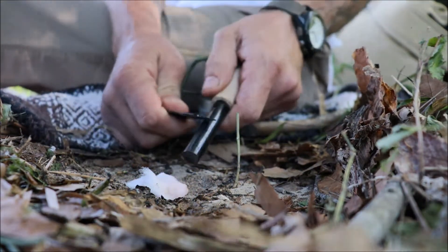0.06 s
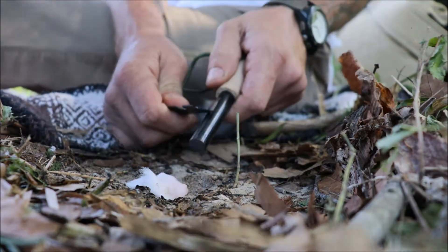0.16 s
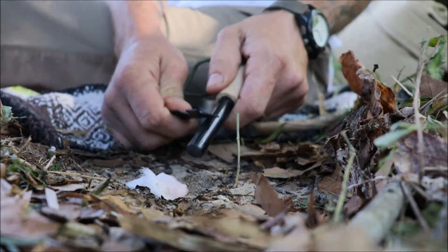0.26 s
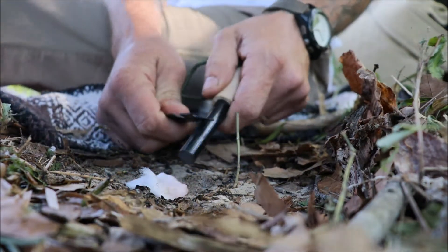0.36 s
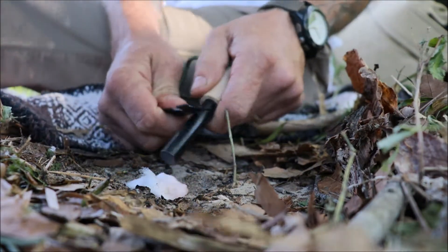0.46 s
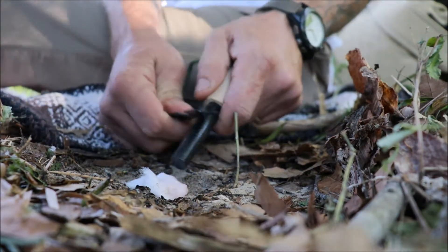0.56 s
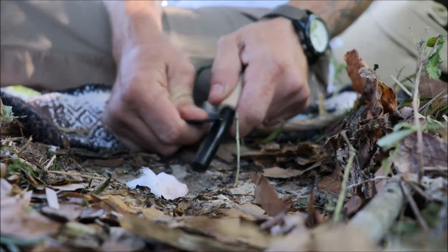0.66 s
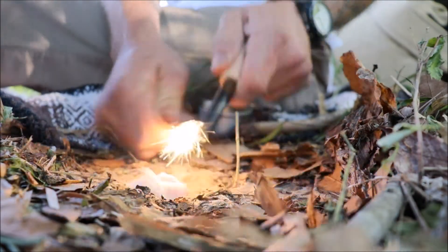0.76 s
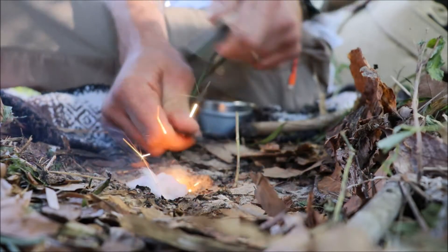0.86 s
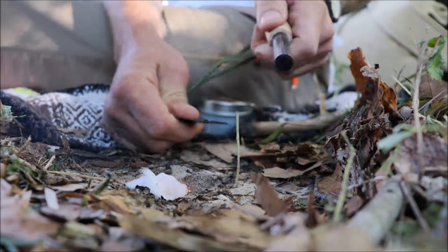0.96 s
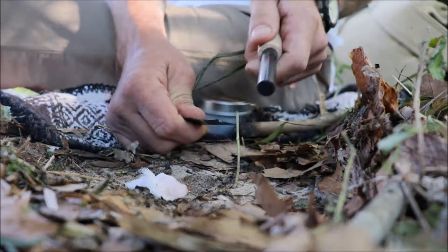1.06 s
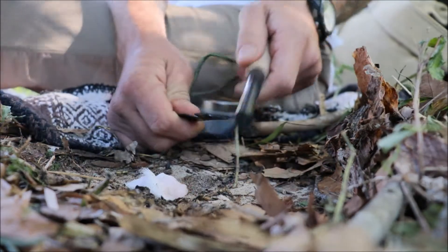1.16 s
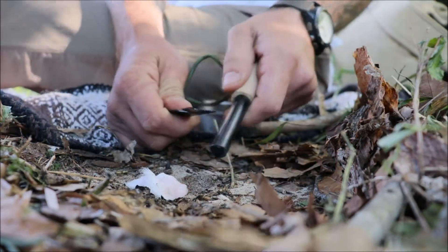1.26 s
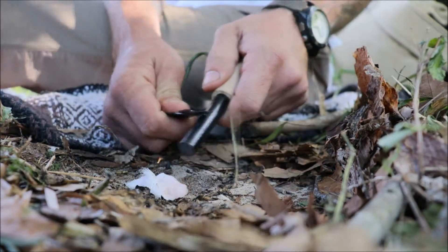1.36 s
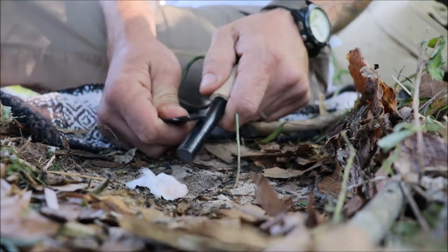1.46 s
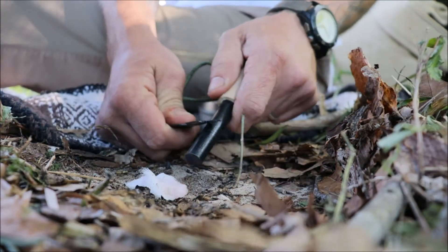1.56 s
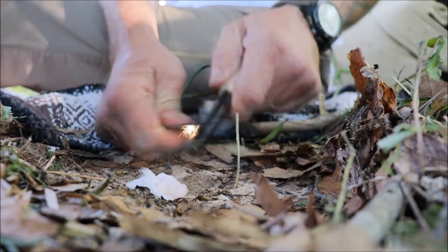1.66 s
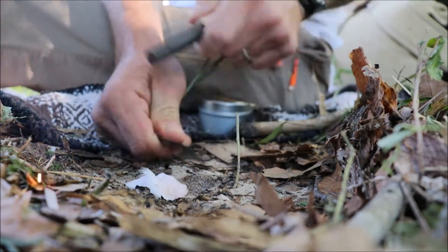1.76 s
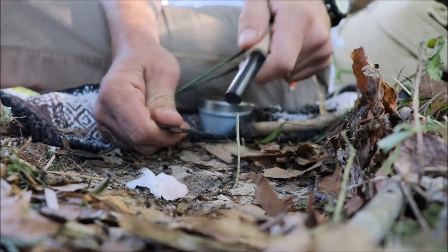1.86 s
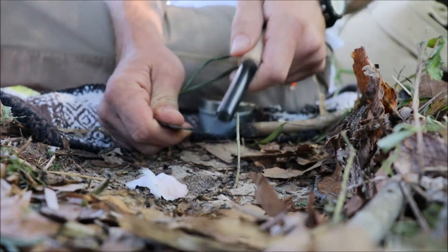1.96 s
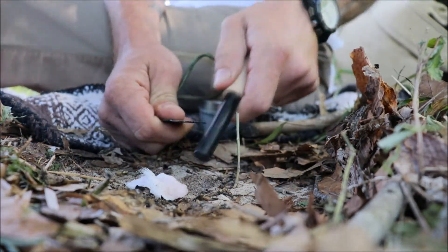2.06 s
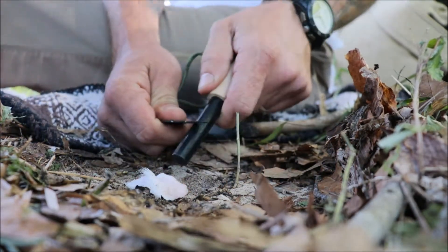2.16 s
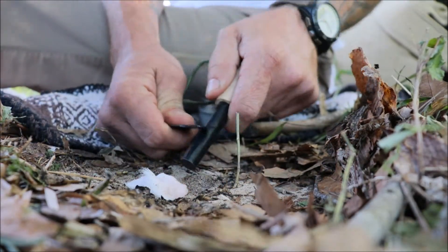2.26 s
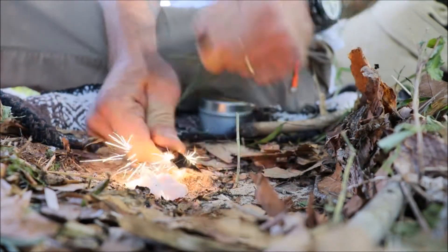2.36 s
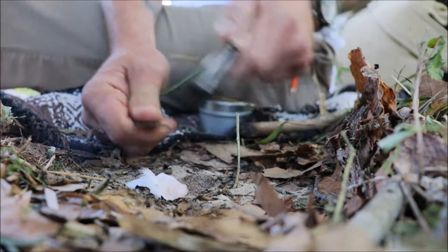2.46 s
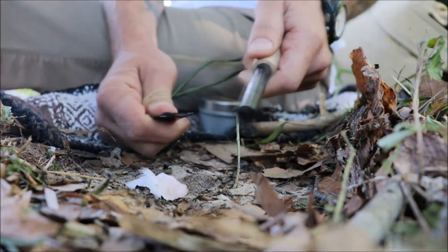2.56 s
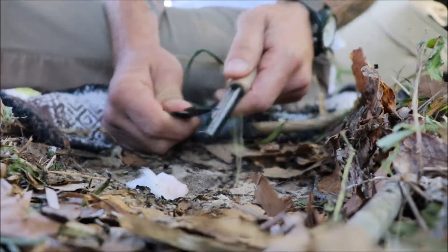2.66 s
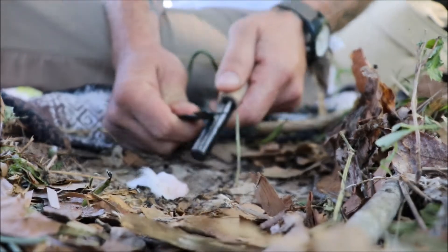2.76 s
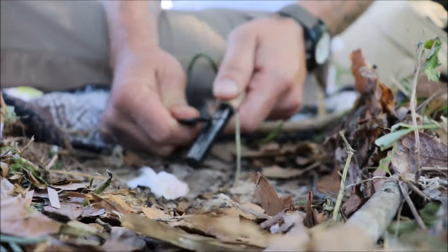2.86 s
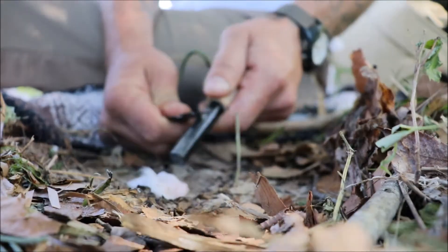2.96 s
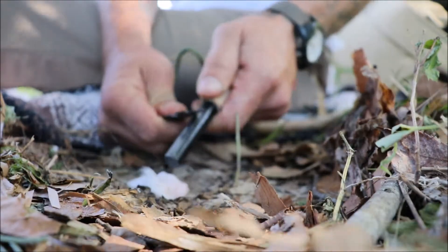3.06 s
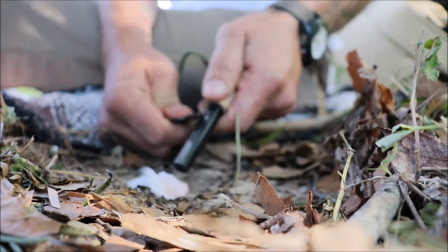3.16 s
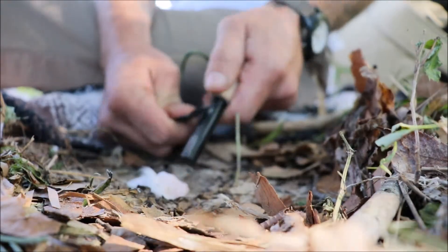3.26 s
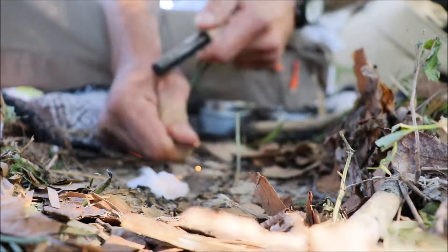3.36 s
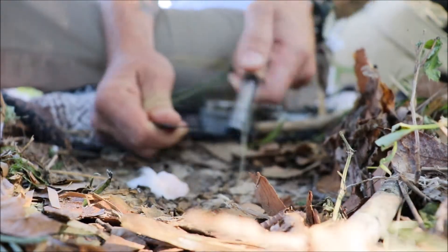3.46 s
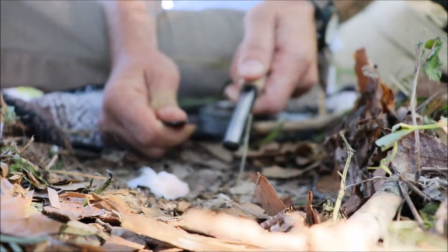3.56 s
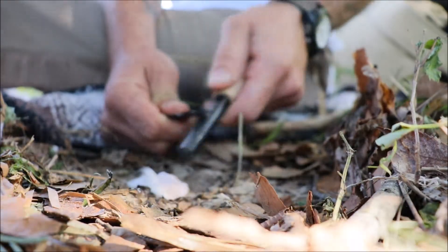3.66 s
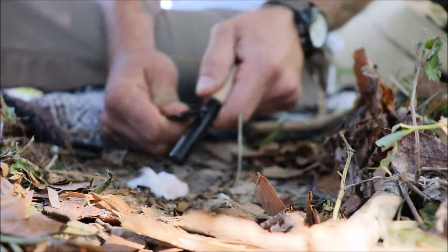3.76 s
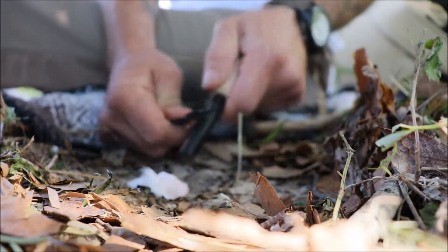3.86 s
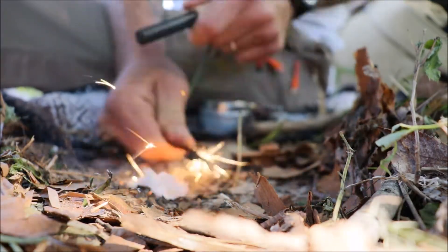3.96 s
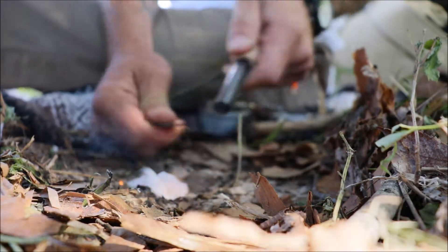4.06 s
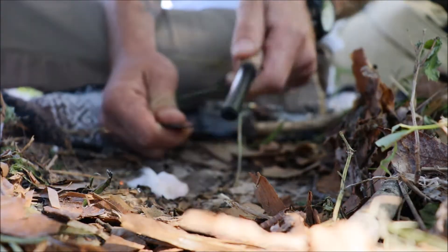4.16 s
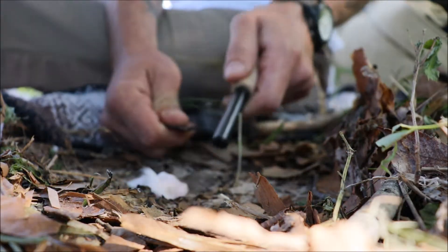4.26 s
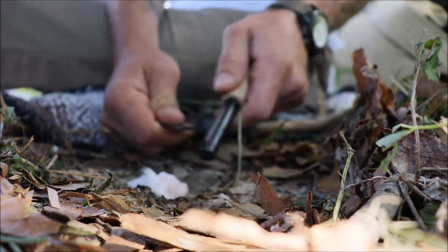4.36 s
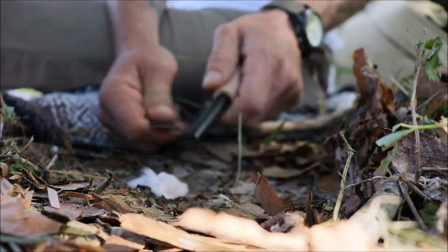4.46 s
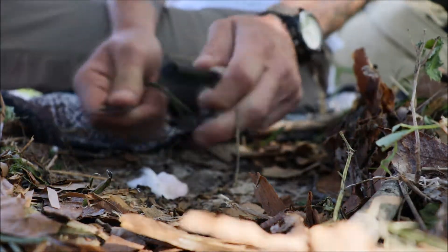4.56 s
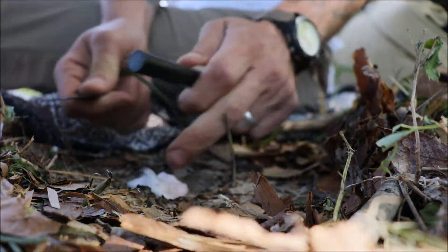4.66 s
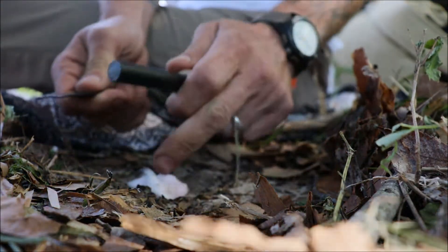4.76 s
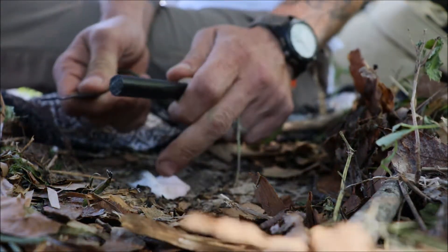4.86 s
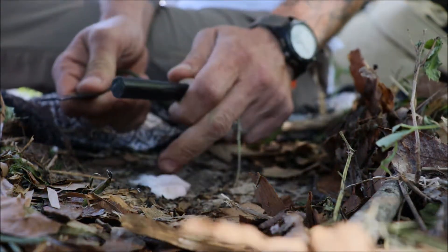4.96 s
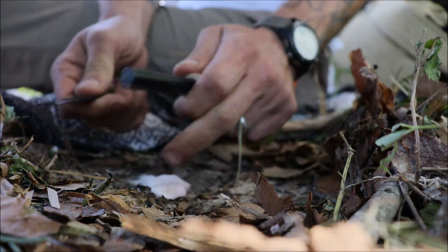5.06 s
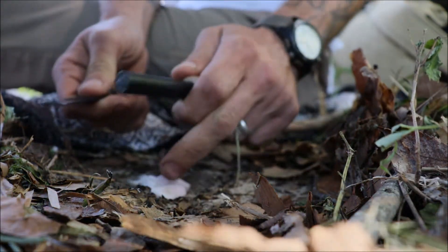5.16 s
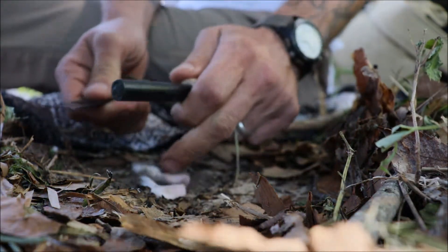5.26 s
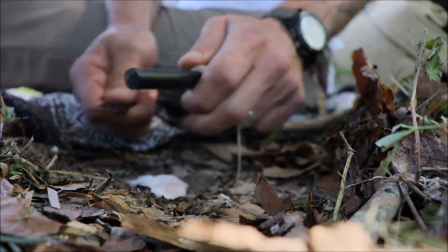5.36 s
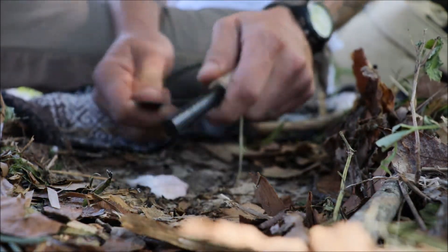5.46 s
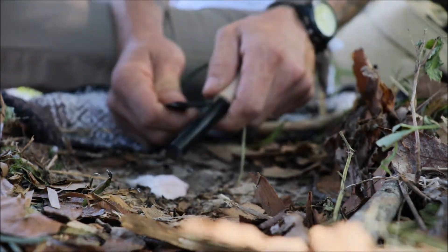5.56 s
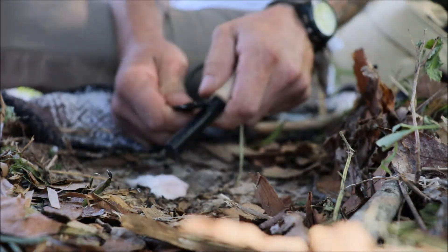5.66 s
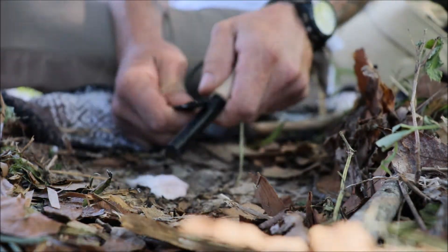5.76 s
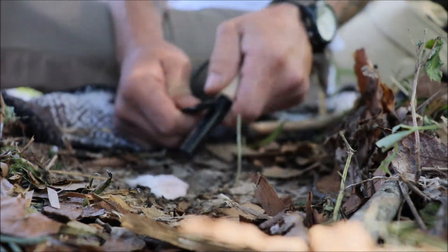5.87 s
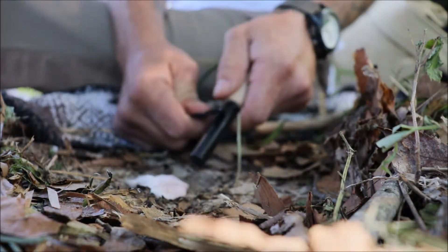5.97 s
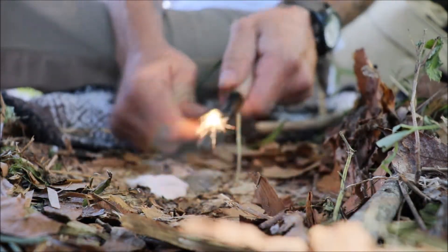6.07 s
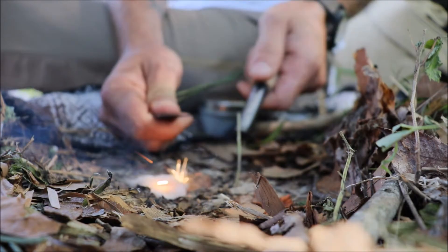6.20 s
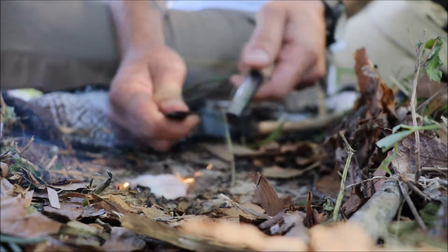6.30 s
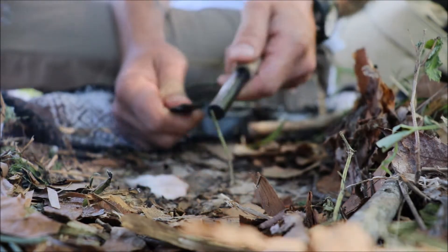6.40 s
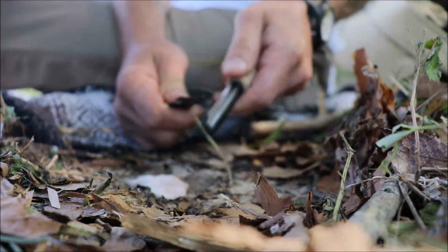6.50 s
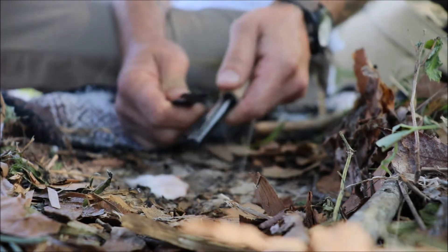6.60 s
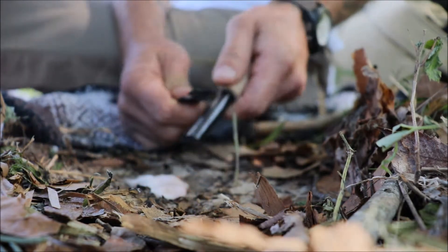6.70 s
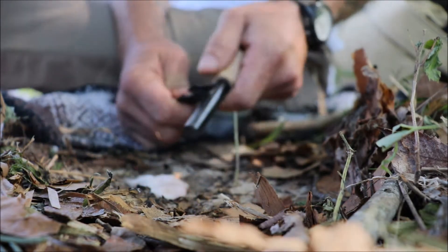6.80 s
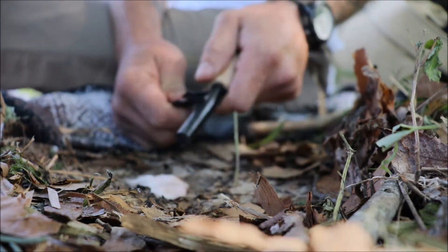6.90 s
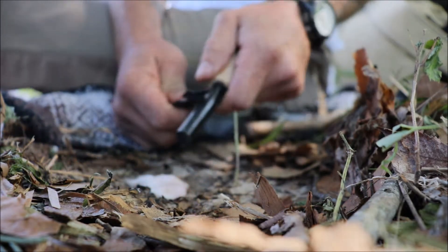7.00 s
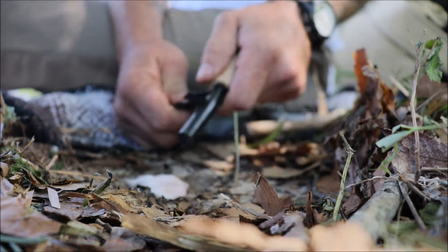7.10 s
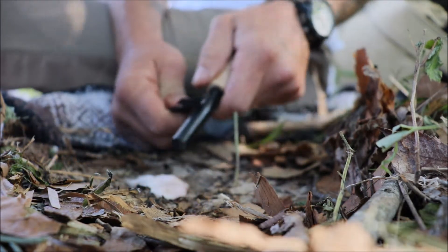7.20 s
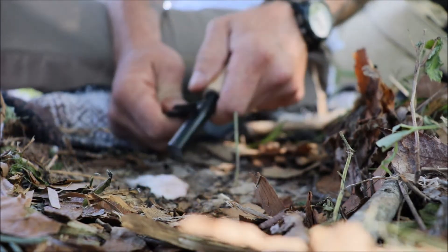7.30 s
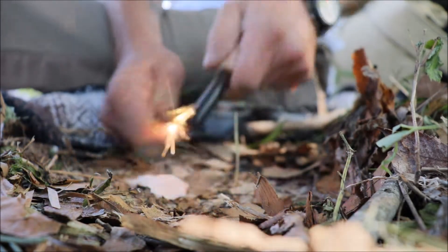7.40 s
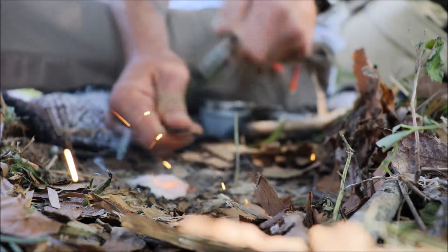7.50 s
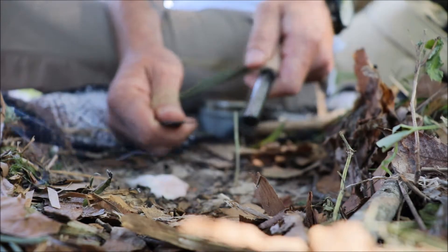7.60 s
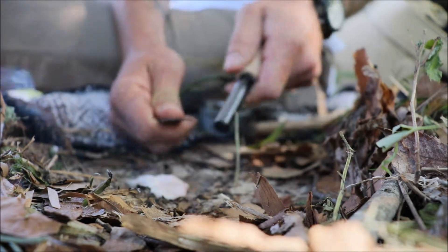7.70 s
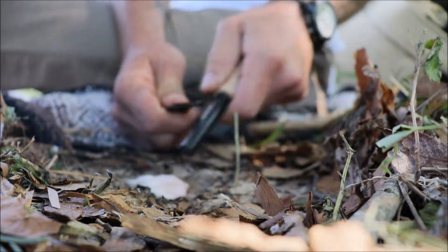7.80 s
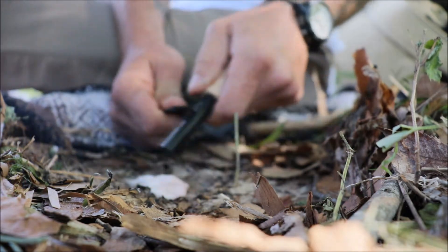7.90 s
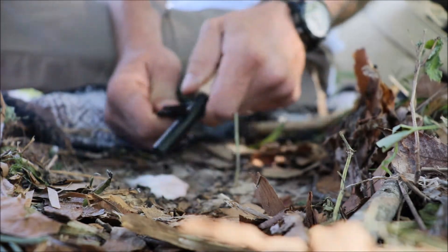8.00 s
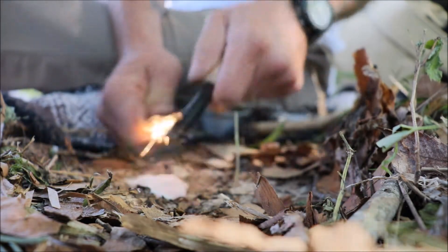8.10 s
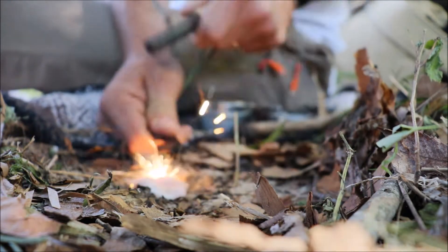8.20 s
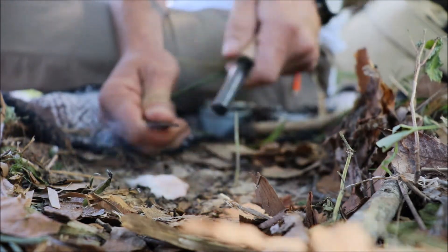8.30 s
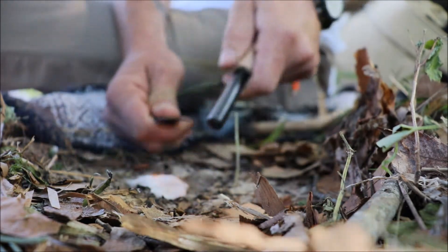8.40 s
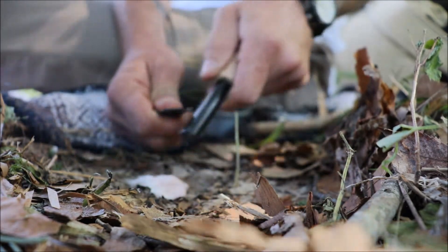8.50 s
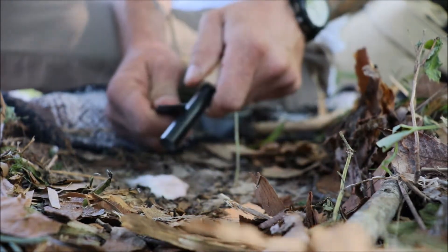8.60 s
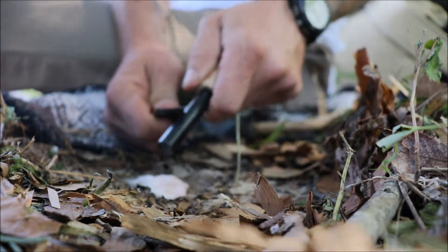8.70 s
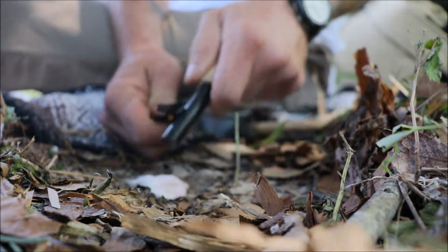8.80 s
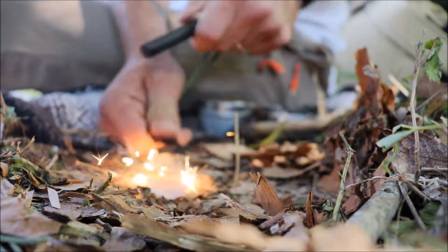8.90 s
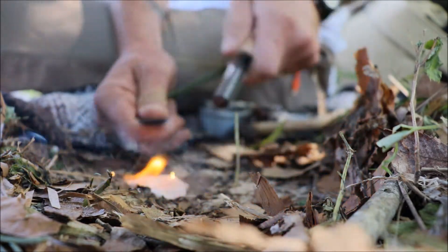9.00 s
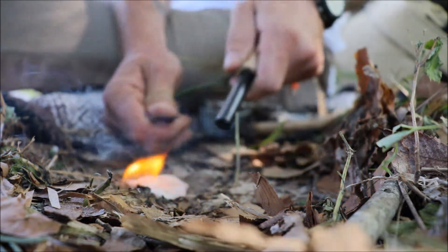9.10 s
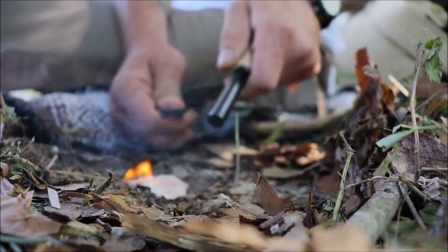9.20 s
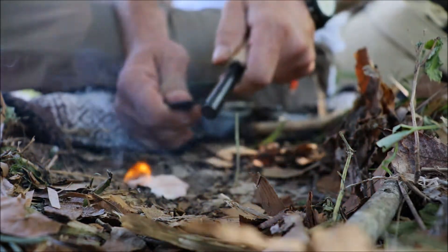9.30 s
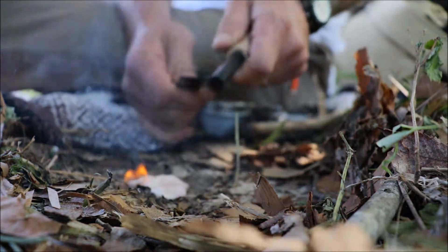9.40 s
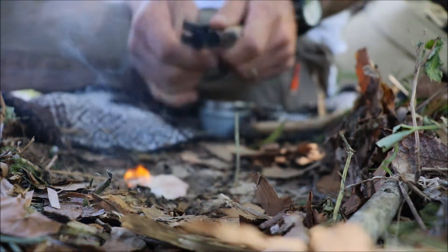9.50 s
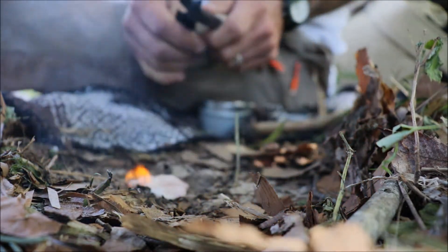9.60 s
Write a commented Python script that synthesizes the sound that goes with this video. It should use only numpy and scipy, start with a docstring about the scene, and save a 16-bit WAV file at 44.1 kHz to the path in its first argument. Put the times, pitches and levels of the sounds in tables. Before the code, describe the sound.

A metal scraper strikes a fire rod in repeated sharp scrapes, sparks crackling and popping, until tinder catches and sputters outdoors.

```python
"""A steel scraper works a fire rod on a forest floor, close to a single microphone.
Over a breeze and the hiss of the woods, the ground is bumped and leaves rustle. The scraper taps the
rod, then friction drives its bending modes into a short ring and burning shavings crackle and pop.
Stroke follows stroke; on four early ones the blade springs off the rod's end. From halfway a far bird
chirps faintly. Near 9 s the last stroke lights the tinder, which sputters."""
import sys
import numpy as np
from scipy import signal
from scipy.io import wavfile
from scipy.ndimage import uniform_filter1d

SR = 44100
rng = np.random.default_rng(int(sys.argv[2]) if len(sys.argv) > 2 else 0)


def output_pcm(signal):
    """Save a mono or channel-first signal as 16-bit PCM at the path in sys.argv[1].

    Samples are clipped to [-1, 1] before scaling.
    """
    pcm = np.clip(np.atleast_2d(signal).T, -1, 1) * 32767
    wavfile.write(sys.argv[1], SR, np.round(pcm).astype(np.int16))


N = 425565

# strength of the breeze and of the hiss of the woods: (time [s], level [dB])
BREEZE_LEVELS = [(0.0, -41), (0.35, -50), (1.07, -40.5), (1.64, -59.5), (3.06, -53.5), (3.3, -46),
                 (3.73, -62.5), (4.57, -47.5), (5.32, -63), (5.99, -63), (6.23, -47), (6.45, -62),
                 (7.23, -68), (8.25, -65), (8.79, -71), (9.0, -57), (9.65, -61)]
WOODS_LEVELS = [(0.0, -46.5), (8.5, -51.5)]
# spectra of breeze, woods, leaves, and a pop arriving off the ground: (frequency [Hz], density [rel dB])
BREEZE_SPECTRUM = [(8.8, -24), (15, 5), (134, 1.5), (230, -8), (273, -12), (539, -51), (1320, -120)]
WOODS_SPECTRUM = [(35, -15.5), (60, -9.5), (217, -2), (469, -9), (636, -9.5), (1550, -11), (2650, -11.5),
                  (8710, -15), (16000, -26.5)]
LEAF_SPECTRUM = [(120, -52), (200, -5.5), (482, -6), (579, -18), (722, -5), (1000, -4), (2470, -11.5),
                 (8580, -24.5), (16000, -42)]
SPARK_SPECTRUM = [(59, -32), (100, -7.5), (189, -2), (634, -2.5), (1130, 0.5), (1720, 1), (4110, -1),
                  (5770, 1), (6700, -2.5), (8460, 4.5), (10700, -6), (12900, 1.5), (16000, -2.5)]
# a knee or hand bumps the ground: (time [s], gain [dB])
GROUND_BUMPS = [(.035, -31), (1.148, -27)]
# leaves and cloth under the hands: (peak time [s], level [dB], rise [s], fall [s], hold [s])
LEAF_RUSTLES = [(0.36, -29, 0.057, 0.059, 0.038), (0.493, -44, 0.047, 0.031, 0.048),
                (1.0, -53.5, .1, .2, 0.38), (1.536, -43, 0.02, 0.025, 0.02),
                (1.58, -43.5, 0.01, 0.03, 0.015), (3.785, -44, 0.035, 0.065, .01),
                (3.932, -42, 0.22, 0.038, 0.013), (4.343, -49.5, 0.2, 0.44, 0.072),
                (7.024, -51.5, 0.12, 0.12, 0.022), (7.412, -44, 0.033, .03, 0.0092),
                (0.225, -47.5, 0.27, 0.11, 0.069)]
# bending modes of the gripped rod: (frequency [Hz], base t60 [s])
ROD_MODES = [(2815, 0.022), (7480, 0.021), (10600, 0.01), (13500, 0.012)]
# the scraper knocks on the rod; a loose grip lets it ring longer: (time [s], gain [dB], mode 1 [rel dB],
# mode 3 [rel dB], mode 4 [rel dB], tick [rel dB], ring length [ratio], pitch [ratio], trace [rel dB])
ROD_TAPS = [(0.1326, -22, -3.5, -30, -27, -12, 0.43, 0.96, -32),
            (1.4112, -8.5, -8.5, -25, -6, -9, 0.34, 0.92, -42),
            (2.1936, -15.5, -6.5, -20, -12, -9, 0.43, 0.86, -26),
            (2.7616, -11.5, -20, -11, -0.5, -10.5, 0.55, 0.94, -30),
            (3.7462, -20.5, -5, -21, -6, -0.5, 0.92, 0.98, -32),
            (5.7375, -41.5, 13, -9, -5, 10.5, 0.23, 1.14, -18),
            (6.4067, -16.5, 3.5, -30, -9, -12, 1.2, 1.02, -26),
            (6.4163, -34.5, 12, -27, -26, -14, 1.5, 1.005, -32),
            (6.791, -15.5, 5, -8, -7, -2, 0.97, 0.99, -32),
            (7.9467, -25.5, 5, -16, 7, 12.5, 0.39, 0.98, -15),
            (8.596, -38.5, 8, -18, -8, 5, 0.35, 0.93, -32)]
# the edge drags along the rod; where it bites sets what rings: (start [s], length [s], bite gain [dB],
# end gain [dB], mode 1 [rel dB], mode 3 [rel dB], mode 4 [rel dB], grinding [rel dB], pitch [ratio],
# ring length [ratio])
ROD_STROKES = [(0.136, 0.23, -50, -58, -17, -20, -20, -12, 1.001, .6),
               (0.455, 0.058, -45, -38, -9, -18, -19, -6, 1.001, 0.47),
               (0.808, 0.035, -29.5, -18, -13.5, -17, -1.5, -4.5, 1.02, 0.27),
               (1.728, 0.041, -30, -21, -22, -4, -2.5, -3.5, 1.04, 0.18),
               (2.387, 0.041, -28, -26, -16, -8, -7, -3.5, 1.06, 0.23),
               (2.763, 0.026, -28.5, -50, -8, -18, -19, -1.5, 1, 0.45),
               (2.793, 0.071, -49.5, -48, -1, -18, -19, -5, 1, 0.38),
               (3.019, 0.043, -46.5, -45, -6, -6, -9, -12, 0.99, 0.18),
               (3.353, 0.042, -31, -28, -18, -1, 4.5, -14, 1.05, 0.24),
               (3.75, 0.035, -35.5, -41, 2.2, -11, -16, -1, 0.96, 0.48),
               (3.94, 0.039, -32, -26, -16, -3, -3, -3, 1.02, 0.45),
               (6.109, 0.033, -27, -18.5, -19, -10, 0, -1.5, 1.06, 0.29),
               (7.426, 0.039, -28, -21, -28, -8, -2, -18, 1, 0.22),
               (8.122, 0.048, -44, -28, -5, 0, 1, 3, 1.04, 0.22),
               (8.85, 0.047, -30.5, -21, -18, -22, -13, -0.5, 1, 0.24)]
# sharp dry pops and clicks, from sparks bursting, scraper clicks and handling ticks:
# (time [s], gain [dB], bass [rel dB], treble [rel dB])
DRY_POPS = [(0.354, -24, -14, -8), (0.836, -4, -14, 5), (0.9891, -15, -33, -5), (1.4418, 2, -15.5, 2.5),
            (1.5377, -21.5, -30, -24), (1.6753, 2, -31, -3.5), (2.1929, -0.5, -38, -2.5),
            (3.461, -6, -15, 2), (3.4758, 0.5, -26, 4), (4.101, -4.5, -45, -10), (4.139, -22, -21, -13),
            (4.2343, -21, -28, 8), (4.3725, -23, -16, -25), (4.834, -16.5, -20, 0), (5.785, -23, -33, -24),
            (6.1404, 2, -9.5, 0), (6.1513, 2.5, -11.5, 3), (6.2227, -5, -19, -2), (6.2466, -6, -39, -9),
            (6.2592, -7, -25, -10), (6.2802, -7.5, -12.5, 5), (6.286, -6, -24, -2), (6.348, -7, -42, 4),
            (6.3519, -5, -46, -1), (6.3922, -9, -39, -5), (6.8222, 5, -25.5, -3), (6.893, -0.5, -35, 0.5),
            (7.4566, 3.5, -23, 16), (7.476, -8.5, -5.5, 8), (7.561, -11.5, -22, -9), (8.1567, 2.5, -19, -2),
            (8.382, -21, -37, -9), (8.396, -20, -41, -3), (8.419, 7, -34, -1), (8.433, -13, -32, 0),
            (8.455, -8.5, -29, 7), (8.4747, -12, -42, 11), (8.8848, 2, -32, 1), (8.8911, -1, -10, 4),
            (8.9022, -6, -20, -5), (8.9317, -11, -8, -3), (8.955, -8, -25, -2), (8.992, -11, -20, -2),
            (9.0105, -25, -4, 0), (9.03, -14, -16, -3), (9.072, -13, -15, -5), (9.099, -15, -9, 1),
            (9.139, -18, -10, -7), (9.1504, -13, -22, 9), (9.164, -12, -20, 3), (9.188, -13, -19, 0),
            (9.214, -27, 9.5, -12), (9.262, -21, -7, -13), (9.2743, -11, -31, -6), (9.3106, -12, -17, -10),
            (9.3224, -15, -19, -2), (9.341, -31, -1, -5), (9.3717, -21.5, 5, 7), (9.398, -22, -12, -6),
            (9.478, -26, -3, 2), (9.5068, -15, -21, -1), (9.53, -26, -1, -1), (9.5615, -27, -1.5, 2),
            (9.607, -24, -9, -2), (9.629, -26, -1.5, 0)]
# shavings flare up: (peak time [s], level [dB], rise [s], fall [s], treble [rel dB])
SPARK_SHOWERS = [(0.851, -19, 0.023, 0.053, -4), (0.886, -26, 0.042, 0.09, -5),
                 (.922, -31, 0.034, 0.018, 5.5), (1.762, -24.5, .03, 0.068, -2),
                 (1.795, -34.5, 0.056, 0.011, -5), (2.427, -19, 0.0099, 0.041, -2.5),
                 (2.464, -33, 0.018, 0.049, 2), (3.402, -22, 0.0047, 0.032, 2),
                 (3.462, -29, 0.02, 0.023, 5.5), (3.475, -29, 0.015, 0.043, -1.5),
                 (3.989, -16.5, 0.021, 0.058, -0.5), (4.041, -25.5, 0.061, 0.057, -1.5),
                 (4.078, -27, 0.016, 0.015, 3.5), (4.103, -26.5, 0.015, 0.047, -5),
                 (4.172, -43, 0.01, 0.027, 3), (6.143, -19.5, 0.046, 0.055, -1.5),
                 (6.218, -31, 0.023, 0.044, 1), (6.26, -30, 0.069, 0.067, 2.5),
                 (6.347, -47, 0.056, 0.11, 9.5), (7.473, -21, 0.037, 0.083, 1),
                 (7.56, -33.5, 0.021, 0.058, 2.5), (8.177, -20, 0.038, 0.11, 0.5),
                 (8.257, -23, 0.013, 0.022, -8), (8.306, -32, 0.036, 0.022, 3.5),
                 (8.419, -34, 0.011, 0.03, 3), (8.891, -17.5, 0.018, 0.047, -2.5),
                 (8.95, -35.5, 0.11, 0.13, 0.5)]
# the blade snaps off the end of the rod: (time [s], gain [dB])
BLADE_RELEASES = [(0.8496, -1.5), (1.77, 0.5), (2.426, 5.5), (3.4029, 1)]
# modes of the blade: (frequency [Hz], level [rel dB], delay [s])
BLADE_MODES = [(2460, -10.5, .0007), (5000, -12.5, -.0001), (8500, -8.5, -.0001), (7530, -4, .0005)]
# a far bird: (start [s], length [s], first pitch [Hz], turning pitch [Hz], last pitch [Hz], level [dB])
BIRD_CHIRPS = [(4.945, 0.031, 2450, 2950, 3200, -58), (5.183, .045, 2700, 2670, 2650, -60),
               (7.588, 0.043, 2280, 2340, 2300, -54), (7.671, 0.055, 2400, 2750, 2386, -51.5)]
# the tinder catches and sputters: (time [s], puffs [dB], fizz [dB], fizz treble [rel dB])
TINDER_LEVELS = [(8.92, -32, -41, -5), (9.04, -46.5, -45, -10), (9.08, -39.5, -37.5, -2.5),
                 (9.21, -44, -38, -8), (9.27, -44, -46.5, -6), (9.35, -42.5, -49.5, 5),
                 (9.42, -55, -43.5, -3), (9.53, -46, -46.5, 7), (9.65, -67, -41.5, -5.5)]


def gain_of(db):
    """Amplitude ratio of a level in decibels."""
    return 10 ** (np.asarray(db) / 20)


def unit_rms(x):
    """Normalisation to unit mean power."""
    return x / np.sqrt(np.mean(x ** 2) + 1e-20)


def add(mix, s, sound):
    """Superposition: a sound joins the mix at time s."""
    part = mix[round(s * SR):][:len(sound)]
    part += sound[:len(part)]


def colour(x, spectrum):
    """Minimum-phase filter of unit energy, shaped by a spectrum table."""
    f, db = np.transpose(spectrum)
    hz = abs(np.fft.fftfreq(4096, 1 / SR))
    log_gain = np.interp(np.log(hz + 1), np.log(f + 1), np.maximum(db, -60)) * np.log(10) / 20
    taps = np.fft.ifft(np.exp(np.conj(signal.hilbert(log_gain)))).real[:2048]
    return signal.oaconvolve(x, taps / np.linalg.norm(taps))[:len(x)]


def passband(x, hz, kind="band"):
    """Maximally flat filter with its edges at hz."""
    return signal.sosfilt(signal.butter(2, hz, kind, fs=SR, output="sos"), x)


def split(x, hz):
    """Complementary crossover: the low part and the remainder."""
    low = signal.lfilter(*signal.butter(1, hz, fs=SR), x)
    return low, x - low


def grains(per_s, spread_db, clump_db, clump_s):
    """Shot noise of rms 1: random clicks of uneven size whose strength comes in clumps."""
    size = gain_of(spread_db * np.minimum(rng.exponential(1, N), 2.5))
    clicks = size * rng.standard_normal(N) * (rng.random(N) < per_s / SR)
    width = max(round(clump_s * SR), 2)
    clumps = unit_rms(uniform_filter1d(uniform_filter1d(rng.standard_normal(N), width), width))
    return unit_rms(clicks * gain_of(clump_db * np.minimum(clumps, 1.5)))


def ring(force, hz, t60):
    """Forced response of one damped mode, steady or gliding in frequency."""
    phasor = np.exp(2j * np.pi * np.cumsum(hz * np.ones(len(force))) / SR)
    decay = np.exp(-np.log(1000) / (t60 * SR))
    return (phasor * signal.lfilter([1], [1, -decay], force / phasor)).imag


def swell(s, db, rise, fall, hold=0., end_db=None, head_db=0.):
    """Exponential envelope: grows to db at time s, slides to end_db while held, then decays."""
    end_db = db if end_db is None else end_db
    depth_db = 25
    times = np.cumsum([s - rise, rise, hold, fall])
    levels = [db - depth_db + head_db, db, end_db, end_db - depth_db]
    on, out = slice(max(round(times[0] * SR), 0), round(times[-1] * SR)), np.zeros(N)
    out[on] = gain_of(np.interp(np.arange(N)[on] / SR, times, levels))
    return out


def tinder_gain(column):
    """Amplitude envelope from one level column, zero until the tinder catches."""
    t, columns = np.arange(N) / SR, np.transpose(TINDER_LEVELS)
    alight = np.clip((t - columns[0][0]) / 0.01, 0, 1)
    return gain_of(np.interp(t, columns[0], columns[column])) * alight


def breeze_and_woods():
    """Turbulence: uneven low pressure fluctuations at the microphone, over the woods' broadband hiss."""
    t = np.arange(N) / SR
    breeze = colour(grains(per_s=21000, spread_db=4.5, clump_db=-2.5, clump_s=0.035), BREEZE_SPECTRUM)
    woods = colour(grains(per_s=30000, spread_db=1.0, clump_db=1.14, clump_s=0.019), WOODS_SPECTRUM)
    breeze_db = np.interp(t, *np.transpose(BREEZE_LEVELS))
    woods_db = np.interp(t, *np.transpose(WOODS_LEVELS))
    return gain_of(breeze_db) * breeze + gain_of(woods_db) * woods


def ground_bumps():
    """Soft impact: a slow contact sends only a puff of low noise through the ground."""
    out, t = np.zeros(N), np.arange(3000) / SR
    puff = unit_rms(passband(rng.standard_normal(len(t)), [90, 380]))
    envelope = t / 0.019 * np.exp(1 - t / 0.0053)
    for s, db in GROUND_BUMPS:
        add(out, s, gain_of(db) * puff * envelope)
    return out


def leaf_rustle():
    """Crumpling noise: dry leaves yield in many small, clumped creaks."""
    creaks = grains(per_s=7000, spread_db=1.5, clump_db=3.5, clump_s=0.0053)
    return sum(swell(*row) for row in LEAF_RUSTLES) * colour(creaks, LEAF_SPECTRUM)


def rod_taps():
    """Free vibration: a knock ticks and rings the modes until the grip damps them; a trace lingers."""
    out, t = np.zeros(N), np.arange(2000) / SR
    trace_t60 = 0.045
    for s, db, first, third, fourth, tick_db, stretch, pitch, trace_db in ROD_TAPS:
        contact = rng.standard_normal(len(t)) * np.exp(-t / 0.0013)
        sound = gain_of(tick_db) * colour(contact, SPARK_SPECTRUM) * (1 - np.exp(-t / 0.00011))
        attack = 1 - np.exp(-t / (0.00068 * stretch))
        trace = gain_of(trace_db - 60 * t / trace_t60)
        middle = 1 + 0.4 * (pitch - 1)  # the grip detunes modes 2 and 3 less than mode 1
        tunings = (pitch, middle, middle, 1)
        for (hz, t60), mode_db, tuning in zip(ROD_MODES, (first, 0, third, fourth), tunings):
            choke = np.exp(-(t / (0.17 * t60 * stretch)) ** 2)
            sound += gain_of(mode_db) * attack * (choke + trace) * np.sin(2 * np.pi * hz * tuning * t)
        add(out, s, gain_of(db) * sound)
    return out


def rod_strokes():
    """Stick-slip friction: tiny jerks of the edge drive the rod's modes over a bright grinding hiss."""
    out = np.zeros(N)
    dense_slips = grains(per_s=14000, spread_db=3.5, clump_db=2.0, clump_s=0.0051)
    chatter = grains(per_s=3000, spread_db=3, clump_db=6, clump_s=0.006)
    for s, length, bite_db, end_db, first, third, fourth, grind_db, pitch, stretch in ROD_STROKES:
        level = swell(s, bite_db, rise=0.0057, fall=0.0075, hold=length, end_db=end_db)
        on = level > 0
        hard = max(bite_db, end_db) > -42  # a lighter touch skips and chatters
        slips = (dense_slips if hard else chatter)[on]
        # the ring climbs 3 % as a hard stroke travels down the rod
        tuning = pitch + hard * 0.03 * np.linspace(-.5, .5, len(slips))
        grind = passband(colour(slips, SPARK_SPECTRUM), 4800, "high")
        sound = gain_of(grind_db) * unit_rms(grind)
        for (hz, t60), mode_db in zip(ROD_MODES, (first, -3.5, third, fourth)):
            # the pressing edge damps the rod and shortens its ring
            sound += gain_of(mode_db) * unit_rms(ring(slips, hz * tuning, stretch * t60))
        out[on] += level[on] * sound
    return out


def dry_pops():
    """Impulsive source: a sharp rarefaction with its ground reflection, a low puff and a brief fizz."""
    out, t = np.zeros(N), np.arange(900) / SR
    sample = np.arange(len(t))
    noises = rng.standard_normal((len(DRY_POPS), len(t)))
    echo_lags = rng.integers(3, 9, len(DRY_POPS))
    _, puff = split(ring(sample == 15, hz=750, t60=0.0028), 200)
    for (s, db, bass_db, treble_db), noise, lag in zip(DRY_POPS, noises, echo_lags):
        snap = 0.3 * (sample == lag) - (sample == 0)
        fizz_db = -10 + 0.4 * bass_db  # the fuller a pop, the more it fizzes
        fizz = gain_of(fizz_db) * noise * np.exp(-t / 0.0017) * (t > 0.0002)
        low, high = split(colour(fizz + snap, SPARK_SPECTRUM), 3600)
        burst = low + gain_of(treble_db) * high
        sound = burst / abs(burst).max() + gain_of(bass_db) * puff / abs(puff).max()
        add(out, s + 0.0008, gain_of(db) * sound)
    return out


def spark_showers():
    """Incoherent summation: burning shavings, and later the tinder, crackle or merge into hiss."""
    flares = sum(swell(s, db, rise, fall) for s, db, rise, fall, _ in SPARK_SHOWERS)
    treble = sum(swell(s, db + treble_db, rise, fall, head_db=2.5)  # brighter at the onset
                 for s, db, rise, fall, treble_db in SPARK_SHOWERS)
    fizz = tinder_gain(column=2)
    fizz_treble = fizz * tinder_gain(column=3)
    strength_db = 20 * np.log10(flares + fizz + 1e-9)
    hiss_share = np.interp(strength_db, [-52, -23], [0, 1])  # weak showers sputter, strong ones hiss
    sputter = grains(per_s=9000, spread_db=3.0, clump_db=9.0, clump_s=0.0025)
    hiss = grains(per_s=11000, spread_db=1.0, clump_db=3.0, clump_s=0.0022)
    burning = np.sqrt(hiss_share) * hiss + np.sqrt(1 - hiss_share) * sputter
    for echo_lag in (5, 9, 16):  # samples; each burning spot has its own ground reflection
        crackle = grains(per_s=1800, spread_db=3.5, clump_db=6.0, clump_s=0.0017)
        burning += 0.24 * np.sqrt(hiss_share) * (crackle + 0.78 * np.roll(crackle, echo_lag))
    low, high = map(unit_rms, split(colour(burning, SPARK_SPECTRUM), 1880))
    rush = unit_rms(passband(rng.standard_normal(N), [60, 240]))
    # a low thump comes with each stroke's flare
    low_whump = gain_of(-23.5) * uniform_filter1d(flares, round(0.037 * SR)) * rush
    _, high_hiss = split(colour(hiss, SPARK_SPECTRUM), 3500)
    even_hiss = unit_rms(1.2 * high + unit_rms(high_hiss))  # the flame fizzes more evenly
    return (flares + fizz) * low + treble * high + fizz_treble * even_hiss + low_whump


def blade_releases():
    """Elastic recoil: the bent blade springs back, each mode swelling and dying within 2 ms."""
    out, t = np.zeros(N), np.arange(-150, 200) / SR
    for s, db in BLADE_RELEASES:
        for hz, mode_db, delay in BLADE_MODES:
            envelope = np.exp(-((t - delay) / 0.00037) ** 2)
            tone = np.sin(2 * np.pi * (hz * t + rng.random()))
            add(out, s + t[0], gain_of(db + mode_db) * envelope * tone)
    return out


def bird_chirps():
    """Amplitude modulation: short gliding tones flutter on their way through the leaves."""
    out = np.zeros(N)
    for s, length, first_hz, turn_hz, last_hz, db in BIRD_CHIRPS:
        progress = np.linspace(0, 1, round(length * SR))
        hz = np.interp(progress, [0, 0.59, 1], [first_hz, turn_hz, last_hz])
        flutter_db = 3.5 * unit_rms(uniform_filter1d(rng.standard_normal(len(hz)), size=250))
        tone = np.sqrt(2) * np.sin(2 * np.pi * np.cumsum(hz) / SR)
        add(out, s, gain_of(db + flutter_db) * tone * signal.windows.tukey(len(hz), 0.3))
    return out


def tinder_puffs():
    """Combustion noise: pockets of gas leave the tinder as dull pulses of a cycle or two."""
    puffs = grains(per_s=600, spread_db=5.0, clump_db=4.0, clump_s=0.0061)
    return tinder_gain(column=1) * unit_rms(passband(puffs, [280, 1300]))


def scene():
    """Scattering: trunks and leaves faintly echo the near sounds; one microphone feeds both channels."""
    near = rod_strokes() + blade_releases() + rod_taps() + spark_showers() + dry_pops() + tinder_puffs()
    t = np.arange(3000) / SR
    scatter = rng.standard_normal(len(t)) * np.exp(-t / 0.0054) * (t > 0.0015)
    echoes = gain_of(-17) * signal.oaconvolve(near, scatter / np.linalg.norm(scatter))[:N]
    mix = near + echoes + ground_bumps() + leaf_rustle() + bird_chirps() + breeze_and_woods()
    return np.tile(mix, (2, 1))


def record(dry):
    """Band limiting and saturation: the microphone's treble limit, full-scale clipping, the same limit."""
    edge_hz = 15950
    lowpass = signal.firwin(511, edge_hz, window=("kaiser", 9), fs=SR)[None]
    clipped = np.clip(signal.oaconvolve(dry, lowpass, "same"), -1, 1)
    return signal.oaconvolve(clipped, lowpass, "same")


dry = scene()
out = record(dry)
output_pcm(out)
```